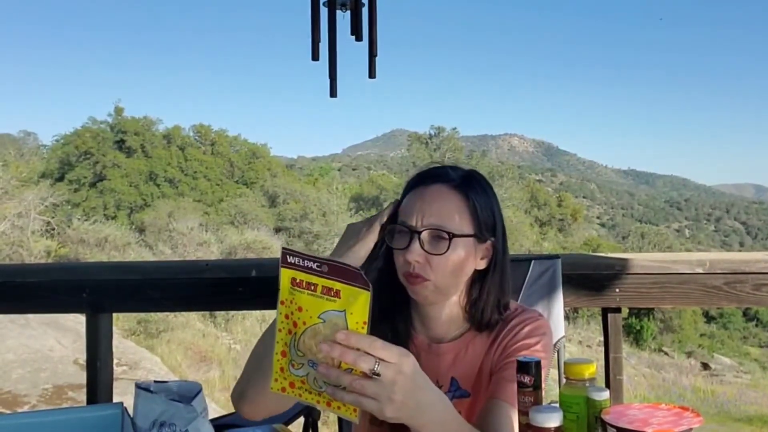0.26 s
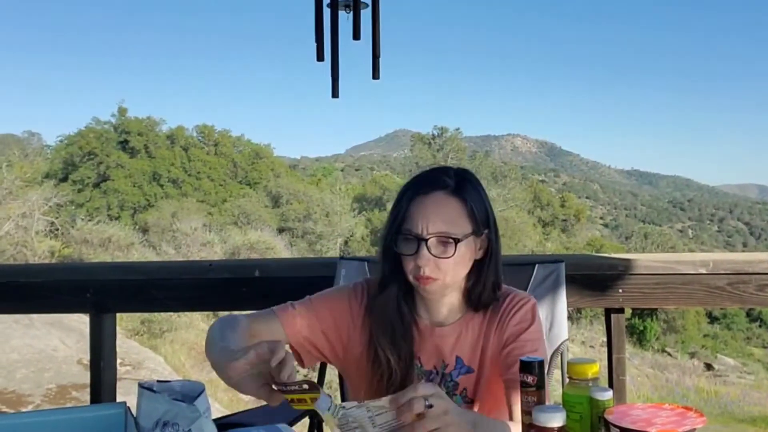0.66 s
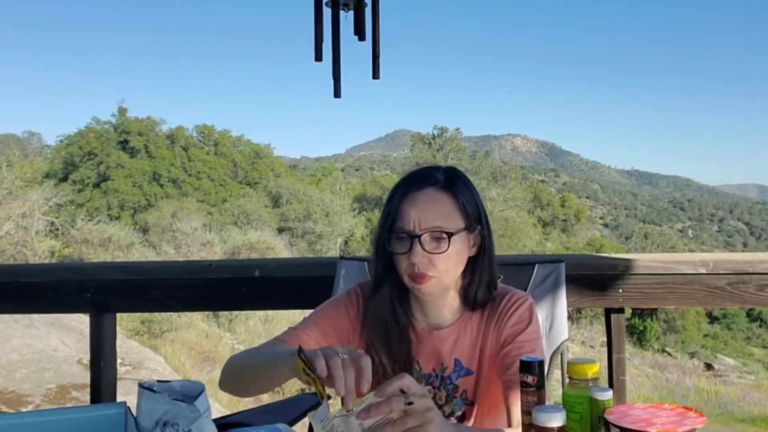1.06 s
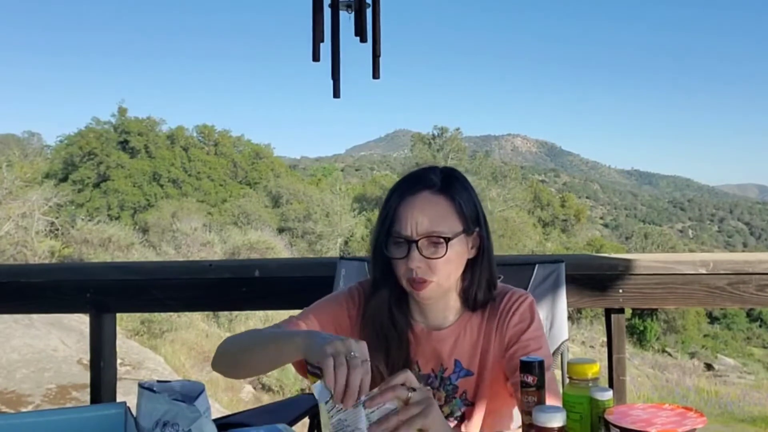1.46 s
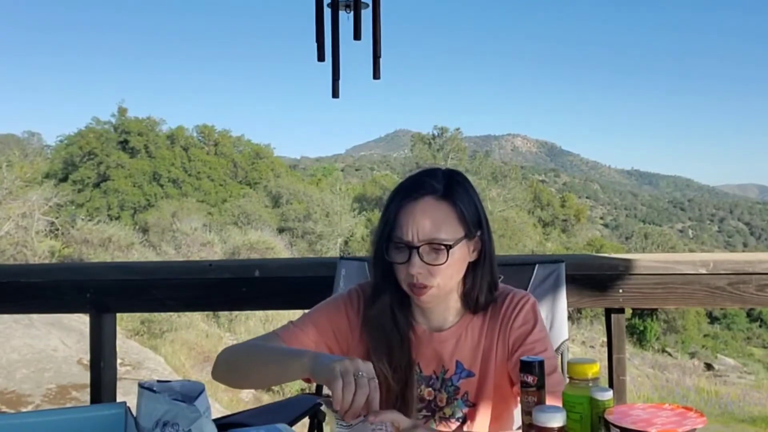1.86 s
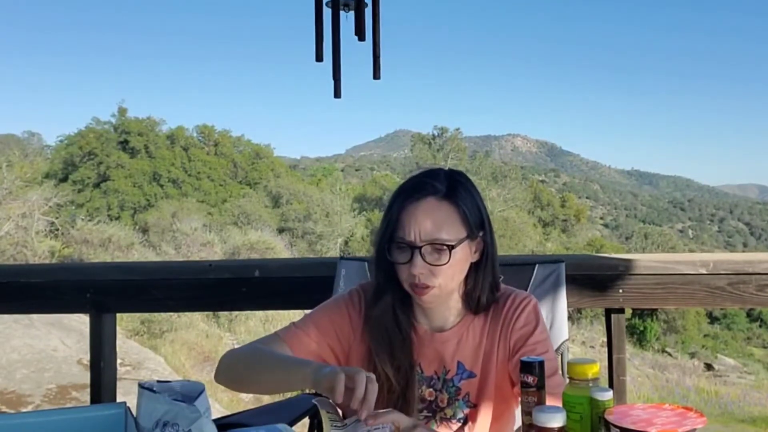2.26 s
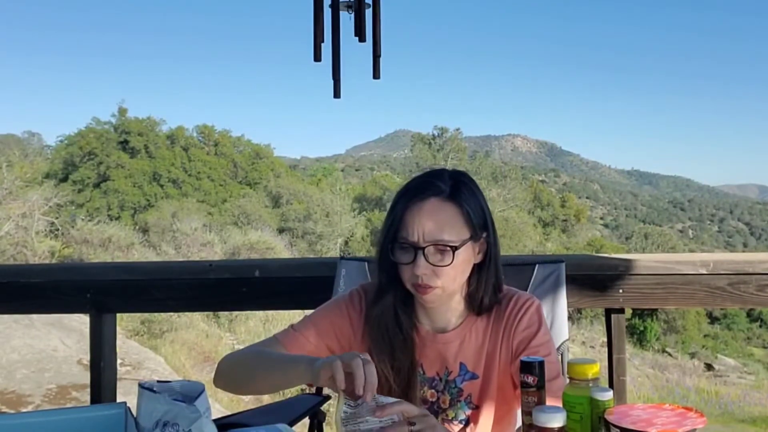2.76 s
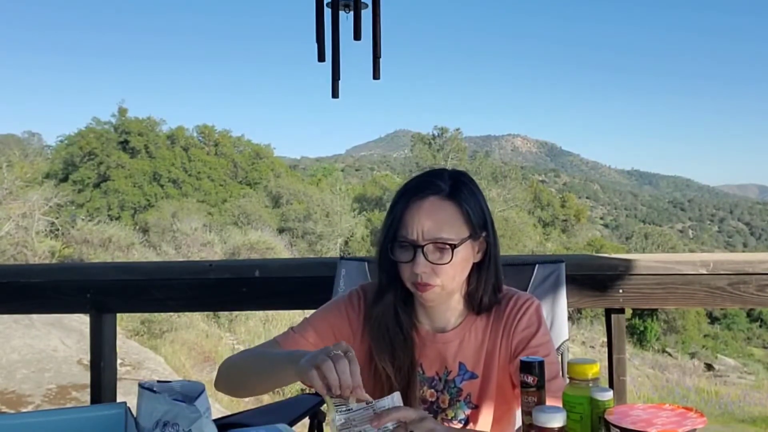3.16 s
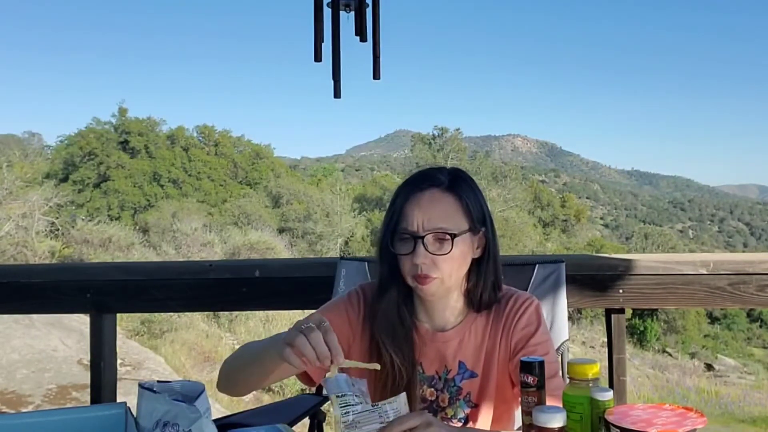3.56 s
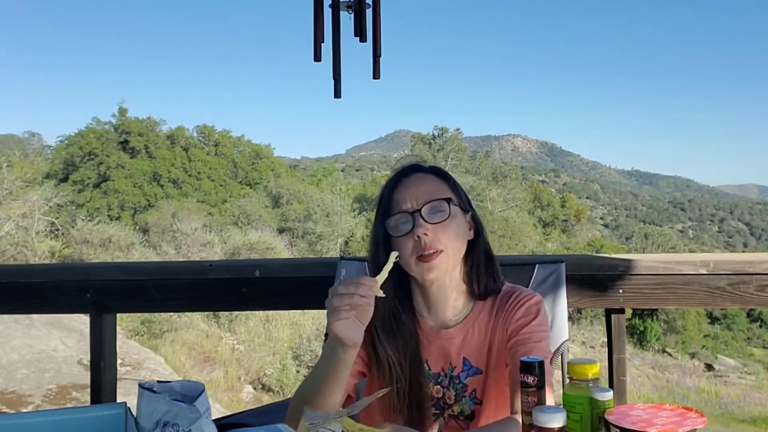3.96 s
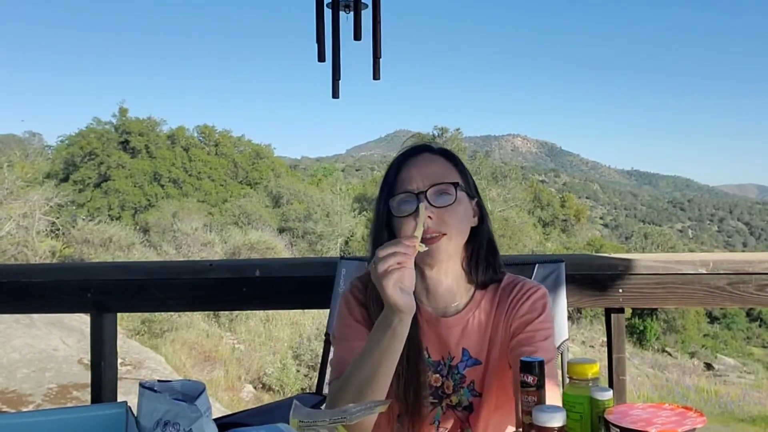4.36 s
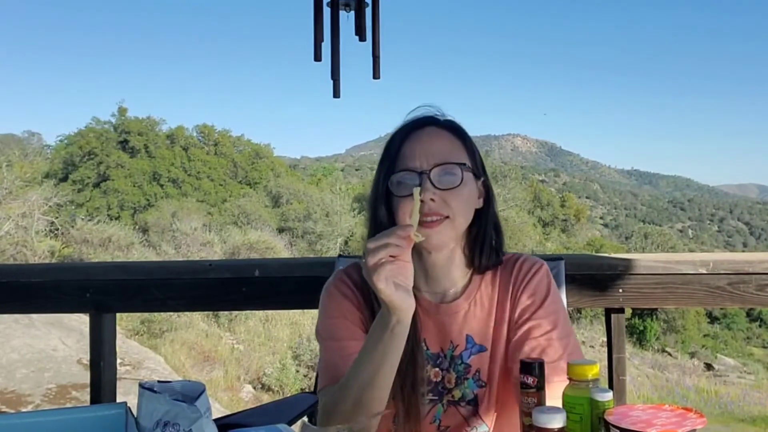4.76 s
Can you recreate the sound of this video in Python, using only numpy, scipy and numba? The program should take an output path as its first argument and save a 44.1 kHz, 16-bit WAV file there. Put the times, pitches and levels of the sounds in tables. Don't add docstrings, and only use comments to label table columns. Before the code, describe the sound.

A quiet porch in open air, heard in stereo from about a metre. The first 0.6 seconds hold only faint valley air, slight hiss and soft low wind puffs. Around 0.65 a hand bumps a hollow table, and at 0.8 a foil snack bag gives a loud crackle with another knock. Light ticks continue until 1.3, then a very sharp snap at 1.64 opens the densest rustling, lasting to about 2.2 with creases, small squeaks and muted knocks. A faint far bird whistles rising notes near 1.45, 2.25 and 2.45. Snaps cluster again at 2.8 to 3.2, then scattered ticks, with cracks near 3.85. At 4.4 to 4.6 dull table knocks return with soft crumpling, and a last crisp crackle comes at 4.8. Bassy wind buffeting swells throughout, differing left and right, strongest between 0.7 and 4.1. Reflections are short and soft.

```python
import sys
import numpy as np
from scipy import signal
from scipy.fft import rfft, irfft
from scipy.io import wavfile
from scipy.ndimage import uniform_filter1d, map_coordinates
from numba import njit

SR = 44100
rng = np.random.default_rng(int(sys.argv[2]) if len(sys.argv) > 2 else 0)


def ratio_of_db(decibels):
    return 10 ** (np.asarray(decibels, float) / 20)


def unload_audio(sound):
    columns = np.transpose(np.atleast_2d(sound))
    steps = np.round(np.clip(columns, -1, 1) * 32767)
    wavfile.write(sys.argv[1], SR, steps.astype(np.int16))


N = 221025
TIME = np.arange(N) / SR


def unit(x):
    return x / np.sqrt(np.mean(x ** 2))


def read(curve, t):
    s, *columns = np.transpose(curve)
    return [np.interp(t, s, column) for column in columns]


def colour_db(points, hz):
    point_hz, point_db = np.transpose(points)
    return np.interp(np.log(hz), np.log(point_hz), point_db, left=-90)


def sides(pan_db):
    return ratio_of_db(np.array([pan_db, -pan_db]) / 2)


def walk(rate_hz):
    hold = int(SR / rate_hz)
    steps = np.repeat(rng.standard_normal(N // hold + 1), hold)
    slewed = uniform_filter1d(uniform_filter1d(steps, hold), hold)
    return unit(slewed[:N])


@njit
def svf(x, hz, q):
    y, band, low, damping = np.empty(len(x)), 0., 0., 1 / q
    for i in range(len(x)):
        g = np.tan(np.pi * hz[i] / SR)
        v = (band + g * (x[i] - low)) / (1 + g * (g + damping))
        band, low, y[i] = 2 * v - band, low + 2 * g * v, damping * v
    return y


def gusts_db(puffs):
    calm_db = -60.5
    power = ratio_of_db(2 * calm_db)
    for s, half_s, db in puffs:
        power = power + ratio_of_db(2 * db) * np.exp(-((TIME - s) / half_s) ** 2)
    return 10 * np.log10(power)


def steady(x, hold_s=0.033, share=0.49):
    return unit(x / uniform_filter1d(x ** 2, int(hold_s * SR)) ** (share / 2))


# (centre [s], half length [s], peak level [dB])
PUFFS_LEFT = [(0.193, 0.017, -45), (0.203, 0.1, -55.5), (0.413, 0.0093, -46), (0.732, 0.029, -34),
              (0.781, 0.28, -41), (0.948, 0.024, -35), (1.059, 0.013, -41), (1.481, 0.047, -43.5),
              (1.846, 0.015, -50), (2.015, 0.047, -40.5), (2.126, 0.025, -31), (2.217, 0.017, -34),
              (2.403, 0.17, -42), (2.784, 0.083, -56), (2.989, 0.019, -38), (3.113, 0.043, -38),
              (3.254, 0.017, -35), (3.261, 0.062, -39.5), (3.47, 0.024, -45.5), (3.62, 0.012, -42),
              (3.92, 0.032, -38), (3.993, 0.014, -31.5), (4.04, 0.04, -41), (4.352, 0.14, -54.5),
              (4.468, 0.014, -36.5), (4.553, 0.037, -41), (4.827, 0.02, -44), (4.992, 0.041, -48)]
# (centre [s], half length [s], peak level [dB])
PUFFS_RIGHT = [(0.138, 0.094, -57.5), (0.28, 0.02, -47), (0.419, 0.015, -49), (0.587, 0.021, -43),
               (0.72, 0.029, -43), (0.913, 0.15, -43), (0.935, 0.061, -41.5), (1.06, 0.015, -31.5),
               (1.367, 0.019, -46), (1.52, 0.035, -37), (1.628, 0.03, -44.5), (1.99, 0.033, -44.5),
               (2.177, 0.056, -38), (2.412, 0.08, -46.5), (2.608, 0.029, -40), (2.903, 0.33, -52.5),
               (3.103, 0.023, -34.5), (3.319, 0.01, -32.5), (3.328, 0.14, -48), (3.685, 0.077, -56),
               (3.8, 0.027, -46.5), (3.936, 0.052, -46.5), (4.067, 0.016, -37.5), (4.107, 0.016, -36.5),
               (4.454, 0.021, -46), (4.606, 0.08, -47), (5.05, 0.13, -44)]


def wind(eddy_hz=70, swing_hz=44, flap_hz=150, top_hz=105, q=1.51, puff_db=1.5, shared=0.34, flap_db=-24):
    common, still = rng.standard_normal(N), np.ones(N)
    steep = signal.butter(4, top_hz, fs=SR, output="sos")
    ports = []
    for puffs in (PUFFS_LEFT, PUFFS_RIGHT):
        db = gusts_db(puffs)
        eddy_db = 1.5 + 0.41 * (db + 46.0)
        air = rng.standard_normal(N) + shared * common
        shed_hz = eddy_hz * (1 + 0.1 * walk(9.7))
        buffeting = svf(svf(air, shed_hz, q), shed_hz, q)
        eddy = steady(signal.sosfilt(steep, buffeting))
        swing = steady(svf(svf(air, swing_hz * still, 1.87), swing_hz * still, 1.87))
        flap = unit(svf(air, flap_hz * still, 3.7))
        mix = ratio_of_db(-eddy_db / 2) * swing + ratio_of_db(eddy_db / 2) * (eddy + ratio_of_db(flap_db) * flap)
        ports.append(ratio_of_db(db - 5 + puff_db * walk(12)) * mix)
    return np.array(ports)


# (frequency [Hz], level per Hz [dB])
VALLEY = [(76, -33), (130, -5.5), (156, -8), (194, -3.5), (291, -4.5), (363, -9.5), (453, -4.5), (554, -9),
          (664, -10), (1060, -17), (1320, -19.5), (1580, -24.5), (7500, -38.5), (9870, -41), (16000, -35.5)]


def valley(level_db=-69, apart_hz=1500):
    hz = np.fft.rfftfreq(N, 1 / SR) + 1
    mid, side = rfft(rng.standard_normal((2, N))) * ratio_of_db(colour_db(VALLEY, hz))
    side = side * np.clip(hz / apart_hz, .3, 1)
    air = unit(irfft(np.array([mid + side, mid - side]), N))
    return air * ratio_of_db(level_db + 0.09 * walk(1.08))


@njit
def ring(s, hz, t60, left, right, turn, rise):
    out = np.zeros((2, N))
    for k in range(len(s)):
        p = np.exp((2j * np.pi * hz[k] - np.log(1000) / t60[k]) / SR)
        fast = np.exp(-1 / (rise * t60[k] * SR))
        z, r, start, soft = 1 + 0j, np.exp(1j * turn[k]), int(s[k] * SR), 1.
        for i in range(start, min(N, start + int(t60[k] * SR))):
            out[0, i] += left[k] * (1 - soft) * z.imag
            out[1, i] += right[k] * (1 - soft) * (z * r).imag
            z *= p
            soft *= fast
    return out


def lean(hz, tilt_db, knee_hz=5000, below=0.76, above=0.34):
    body = below * np.maximum(np.log2(hz / 2500), -.8)
    return tilt_db * (body + above * np.maximum(np.log2(hz / knee_hz), 0))


# (frequency [Hz], level per Hz [dB])
FILM = [(440, -5.5), (700, -10.5), (1050, -15), (1500, -7.5), (2300, -6.5), (3300, -8), (5300, -12),
        (7500, -16), (11000, -27), (16000, -36.5)]


def film(shape, tilt_db, low_hz=450, span_octaves=5.115):
    order = rng.permuted(np.broadcast_to(np.arange(shape[-1]), shape), axis=-1)
    rank = order + rng.random(shape)
    hz = low_hz * 2 ** (span_octaves * rank / shape[-1])
    return hz, colour_db(FILM, hz) + 6 * np.log2(hz / 2500) + lean(hz, tilt_db)


IN_PLAY = rng.standard_normal((400, 80))


def crackle(s, hz, db, t60, scatter_db, rise=0.0076, patchy_db=0, turn=1.0, skew=0.73, shade_db=1.3):
    size, place, phase = rng.random((3,) + hz.shape)
    in_play = map_coordinates(IN_PLAY, [s / 0.075, np.log2(hz / 400) / 0.1895], order=1)
    pan_db = read(RUSTLE, s)[2] + 5 * (place - .5) + shade_db * np.log2(hz / 2500)
    level_db = db + patchy_db * in_play - scatter_db * np.log(size + 0.0024)
    left, right = ratio_of_db(level_db) * sides(pan_db)
    lag = turn * (2 * phase - 1) + skew * np.minimum(hz / 4000, 2.2)
    t60 = t60 + 0 * hz
    return ring(s.ravel(), hz.ravel(), t60.ravel(), left.ravel(), right.ravel(), lag.ravel(), rise)


# (time [s], rustle level [dB], brightness [dB per octave], left minus right [dB])
RUSTLE = [(0.6, -99, 5, -6), (0.7, -107, -23, -1), (0.82, -46, 2, 2), (1.13, -69, 1, -4),
          (1.31, -54, -3.5, 1), (1.46, -75, 2, 0), (1.61, -68, -2, 1), (1.71, -50, -5, 1),
          (1.77, -44.5, 2.5, 1), (1.87, -51, -2, 1.5), (1.93, -40.5, -0.5, 1), (2.0, -54.5, 1, 0.5),
          (2.07, -45, -0.5, 0.5), (2.12, -61.5, -0.5, -1), (2.55, -63, 1, 1), (3.0, -82, 9, 0),
          (3.12, -61, -1, 0.5), (3.5, -66, -0.5, 1), (4.37, -71, 1, 0), (4.59, -57.5, -1, -2.5),
          (4.82, -62.5, -2, 0.5), (5.01, -60, -5, -1)]


def rustle(count=20000, clump_db=2.0, sheen_db=6):
    s = rng.uniform(RUSTLE[0][0], N / SR, count)
    db, tilt_db, _ = read(RUSTLE, s)
    hz, radiated_db = film(s.shape, tilt_db)
    clumps_db = clump_db * np.interp(s, TIME, walk(70))
    db = db + clumps_db + sheen_db * np.clip((hz - 8000) / 2500, 0, 1)
    return crackle(s, hz, db + radiated_db + 2.0, 22 / hz, scatter_db=-0.5, patchy_db=-0.5, rise=0.14)


def prickle(count=900, size=14, prickle_db=-2, scatter_db=2.0):
    s, strength = rng.random((2, count, 1))
    s = RUSTLE[0][0] + s * (N / SR - RUSTLE[0][0])
    db, tilt_db, _ = read(RUSTLE, s)
    hz, radiated_db = film((count, size), tilt_db, low_hz=920, span_octaves=4.09)
    db = db + prickle_db - scatter_db * np.log(strength + 0.015)
    return crackle(s + 0 * hz, hz, db + radiated_db, 12 / hz, scatter_db=-1.0, patchy_db=0.0, rise=0.095)


# (time [s], peak level [dB], large patch [Hz], treble minus body [dB])
CRUMPLES = [(0.6337, -44.5, 2520, -14), (0.6416, -42.5, 2310, -17), (0.9174, -66.5, 2130, -4),
            (1.557, -47.5, 1430, -23), (1.603, -58, 2330, -24), (1.6123, -36.5, 2120, -40),
            (1.735, -50.5, 1370, -13), (1.8132, -49, 2280, -12), (1.8211, -39.5, 1840, -39),
            (1.8889, -36.5, 1920, -28), (1.897, -39.5, 2330, -8), (1.962, -38, 2180, -38),
            (2.016, -43, 2140, -23), (2.07, -47, 2330, -16), (2.807, -57.5, 905, -49),
            (2.846, -56, 2300, -23), (2.914, -49, 2190, -36), (2.924, -44, 2190, -34),
            (3.1165, -62.5, 950, -8), (3.1308, -49, 2250, -42), (3.3647, -58.5, 980, -23.5),
            (3.4127, -61, 990, -10), (3.4842, -66, 1230, -6), (3.5986, -64, 1080, -24.5),
            (3.899, -58, 2130, -34), (4.4207, -41, 1240, -21), (4.433, -39, 1260, -29.5),
            (4.579, -50, 1150, -66), (4.5974, -44.5, 1370, -41), (4.7239, -34, 1860, -29.5),
            (4.9133, -38, 1120, -30.5)]
# (time [s], peak level [dB], small patch [Hz], treble minus body [dB])
TICKS = [(0.687, -54, 4100, -35), (0.9369, -45, 7200, -4), (0.964, -53.5, 3000, -9),
         (1.0528, -49, 2800, -43), (1.084, -57, 2800, -9), (1.1845, -51.5, 4060, -12),
         (1.1914, -54, 4600, -12), (1.264, -43.5, 2540, -5.5), (1.285, -40, 4870, -25),
         (1.3091, -53, 4320, -24), (1.3472, -40, 4800, -14), (1.459, -60, 3130, -28),
         (1.472, -53.5, 4200, -45), (1.57, -44, 2500, -6), (1.605, -49, 4030, -15), (1.618, -48, 4470, -12),
         (1.6735, -61, 4970, -2), (1.698, -45, 2470, -29), (1.7238, -45, 2290, -40), (1.759, -46, 4260, 1),
         (1.7703, -39.5, 2200, -10), (1.814, -39.5, 3300, -31), (1.8576, -38, 2160, -33),
         (2.184, -43.5, 2880, -46), (2.587, -77, 3370, -16), (2.787, -53, 3080, -64),
         (2.882, -52.5, 5970, -6), (2.9685, -43, 4000, -13), (3.1985, -42, 3230, -42),
         (3.3067, -54, 2850, -75), (3.3834, -45.5, 4000, -16), (3.441, -50.5, 3120, -27),
         (3.5621, -54, 2770, -6), (3.901, -53, 2440, -28), (3.997, -57.5, 3050, -17)]
# (time [s], peak level [dB], large patch [Hz], small patch [Hz], treble minus body [dB])
CRACKS = [(0.8146, -27, 2800, 6840, -20.5), (0.836, -20, 1290, 1790, -30.5),
          (0.8389, -25.5, 1300, 1760, -40), (1.3394, -37.5, 1760, 3000, -8), (1.6347, -36, 2150, 2870, -20),
          (1.6439, -17.5, 2270, 3360, -12), (1.65, -32, 2200, 3300, -26), (1.6548, -51, 2184, 3290, -31),
          (1.6631, -37, 1330, 3040, -52), (1.6878, -36.5, 1340, 3230, -44),
          (1.7504, -31.5, 1480, 2850, -33), (1.909, -23.5, 2240, 3830, -34),
          (1.9663, -32.5, 1530, 3050, -42), (2.0518, -26.5, 1760, 2050, -16.5),
          (2.0598, -29, 1100, 2630, -23), (2.201, -25, 2170, 2970, -48), (2.3459, -36, 1420, 4700, -36),
          (2.3632, -30, 1910, 3370, -19.5), (2.8413, -34.5, 2000, 3010, -42),
          (2.933, -23.5, 2500, 3250, -17.5), (2.9501, -27.5, 1370, 2920, -32),
          (2.9634, -26.5, 2230, 3840, -30), (3.1782, -35.5, 1930, 3330, -27.5),
          (3.8376, -32, 2480, 4330, -25), (3.9154, -31, 1116, 2375, -15.5),
          (4.7944, -25, 2090, 2680, -18.5), (4.8065, -34.5, 1880, 2860, -76)]


def creases():
    rows = []
    for s, db, large_hz, small_hz, treble_db in CRACKS:
        after_db = -15.5 - 0.36 * (db + 35.0)
        rows.append((s, db, large_hz, small_hz, treble_db, after_db, -1, 0.5))
    for s, db, large_hz, treble_db in CRUMPLES:
        rows.append((s - 0.001, db, large_hz, 2790, treble_db, 3.5, 1.5, -1.5))
    for s, db, small_hz, treble_db in TICKS:
        rows.append((s, db, 1450, small_hz, treble_db, -14.5, -4.5, 1.5))
    return rows


def crack(s, db, large_hz, tilt_db, crack_s, burst_s=.0003):
    hz, radiated_db = film((len(s), 64), tilt_db)
    at = s + burst_s * rng.random(hz.shape)
    radiated_db = radiated_db + 16 * np.minimum(np.log2(hz / large_hz) + 0.45, 0)
    finest = np.clip(np.log2(hz / 7800) / 0.44, 0, 1)
    radiated_db = radiated_db + 9 * np.minimum(tilt_db - 3.5, 0) * finest
    level_db = db + radiated_db - 1.22 * np.log2(hz / 2500) - 5.5
    return crackle(at, hz, level_db, np.minimum(crack_s, 22 / hz), scatter_db=-0.5, rise=0.14)


def shower(s, db, large_hz, tilt_db, after_s, swell_s=0.0034):
    hz, radiated_db = film((len(s), 360), tilt_db)
    late = 4 * rng.random(hz.shape)
    swell = 1 - np.exp(-late * after_s / swell_s)
    fade_db = 20 * np.log10(swell + 0.0013) - 6.32 * late
    size_db = 5 * np.minimum(np.log2(hz / large_hz) + 0.39, 0)
    level_db = db + radiated_db - 1.5 + fade_db + size_db
    at = s + after_s * late - .0015
    return crackle(at, hz, level_db, 20 / hz, scatter_db=0.5, patchy_db=4.0, rise=0.028)


def freed_patch(s, db, patch_hz, tilt_db, crack_s, after_s, spread=0.042, patch_db=-8, hum_db=-29):
    hz = patch_hz * (1 + spread * np.array([0, -1, 1]))
    level_db = db + lean(hz, tilt_db) + patch_db + np.array([5, -4, -4])
    struck = crackle(s + 0 * hz, hz, level_db, 1.43 * crack_s, scatter_db=-2.0, rise=0.11)
    hz = patch_hz * (1 + 0.21 * spread * rng.standard_normal((len(s), 16)))
    late = 3 * rng.random(hz.shape)
    level_db = db + lean(hz, tilt_db) + hum_db - 7 * late
    return struck + crackle(s + .005 + after_s * late, hz, level_db, 40 / hz, scatter_db=2.0)


def snaps(after_s=.018, crack_s=0.0064):
    columns = np.transpose(creases())[:, :, None]
    s, db, large_hz, small_hz, treble_db, after_db, large_db, small_db = columns
    tilt_db = (treble_db + 27.0) / 2.69
    out = crack(s, db, large_hz, tilt_db, crack_s)
    out += shower(s, db + after_db, large_hz, tilt_db, after_s)
    out += freed_patch(s, db + large_db, large_hz, tilt_db, crack_s, after_s)
    return out + freed_patch(s, db + small_db, small_hz, tilt_db, crack_s, after_s)


# (time [s], peak level [dB], upper modes [dB], rattle length [s])
KNOCKS = [(0.643, -43.5, -5, 0.017), (0.838, -35.5, -4, 0.016), (1.191, -60.5, -2, 0.021),
          (1.284, -51.5, -5, 0.02), (1.555, -54.5, 3.5, 0.021), (1.619, -42.5, -26, 0.035),
          (1.696, -47, -0.5, 0.03), (1.799, -60, -9, 0.015), (1.899, -50.5, -11, 0.019),
          (2.043, -47.5, -1, 0.023), (2.955, -43, -1, 0.02), (3.173, -44, -8.5, 0.02),
          (4.418, -33.5, -1, 0.03), (4.451, -37.5, -2, 0.02), (4.498, -58.5, 14.5, 0.021),
          (4.526, -55.5, 9.5, 0.013), (4.592, -40.5, 1.5, 0.018), (4.616, -52.5, 5, 0.028),
          (4.722, -36, 0.5, 0.029), (4.914, -42, -1, 0.021)]
# (frequency [Hz], level [dB], 60 dB decay [s])
TABLE = [(182, -14.5, 0.033), (235.6, -7.5, 0.059), (300, -10, 0.032), (350.4, 2, 0.058),
         (376, -15.5, 0.03), (511, -7.5, 0.032), (652, -9.5, 0.036), (761, -6, 0.021), (997, -8.5, 0.06),
         (1235, -5, 0.029), (1453, -11, 0.012), (1940, -3, 0.0074)]


def folding_table(count=24, rise=0.03):
    s, db, upper_db, rattle_s = np.transpose(KNOCKS)[:, :, None, None]
    hz, mode_db, t60 = np.transpose(TABLE)
    upper = hz > 450
    rebounds = 3 * rng.random((len(s), count, 1))
    late = np.concatenate([np.zeros((len(s), 1, 1)), rebounds], axis=1)
    detune = 1 + 0.058 * rng.standard_normal((len(s), count + 1, len(hz)))
    lighter_db = 6.0 * late + (late > 0) * np.where(upper, 5, 11)
    gain = ratio_of_db(db + mode_db + upper_db * upper - lighter_db)
    at = s + np.abs(rattle_s) * late
    at, hz, t60 = (np.broadcast_to(v, gain.shape).ravel() for v in (at, hz * detune, t60))
    turn = 0.86 * (hz > 450) * rng.standard_normal(len(at))
    return ring(at, hz, t60, gain.ravel(), gain.ravel(), turn, rise)


# (start [s], end [s], pitch [Hz], level [dB])
SQUEAKS = [(0.686, 0.695, 2330, -58.5), (0.698, 0.744, 2470, -67.5), (0.686, 0.716, 4370, -71),
           (1.777, 1.782, 1410, -54), (1.853, 1.862, 2170, -64), (1.664, 1.668, 1370, -53),
           (4.062, 4.081, 3700, -82), (0.754, 0.789, 2080, -76), (0.93, 0.98, 7000, -67),
           (1.05, 1.122, 7100, -87), (1.181, 1.202, 4860, -70.5), (1.333, 1.356, 10600, -75),
           (2.122, 2.152, 2180, -65.5), (2.204, 2.214, 2960, -56.5), (2.376, 2.401, 3500, -78.5),
           (4.797, 4.852, 2700, -85)]


def squeaks(count=30):
    start, end, hz, db = np.transpose(SQUEAKS)[:, :, None]
    slip, detune = rng.random((2, len(hz), count))
    when = (np.arange(count) + slip) / count
    hz = hz * (1 + 0.034 * (detune - .5) - 0.036 * when)
    return crackle(start + (end - start) * when, hz, db - 6 * when, 0.02, scatter_db=2.0)


def porch(x, t60=0.13, wall_s=0.0085, wall_fade_s=0.0049, wall_db=12, wet_db=-9):
    t = TIME[:int(.2 * SR)]
    since = np.maximum(t - wall_s, 0)
    wall = 1 + ratio_of_db(wall_db) * np.exp(-since / wall_fade_s)
    shape = (t > wall_s) * ratio_of_db(-60 * since / t60) * wall
    shared, own = rng.standard_normal(len(t)), rng.standard_normal((2, len(t)))
    tail = (shared + 1.47 * own) * shape
    tail = tail / np.sqrt(np.sum(tail ** 2, axis=1, keepdims=True))
    return x + ratio_of_db(wet_db) * signal.fftconvolve(x, tail, axes=1)[:, :N]


# (start [s], level [dB])
NOTES = [
    (1.44, -88),
    (2.25, -77),
    (2.455, -77.5),
]
# (time after start [s], pitch [Hz], level [dB])
NOTE = [(0, 3350, 2), (.015, 3600, 0), (.035, 4200, 1), (.05, 4350, -3), (.09, 4300, -4)]


def bird(echo_s=.012, echo_db=-14):
    out = 0
    for start, level_db in NOTES:
        since = TIME - start
        hz, db = read(NOTE, since)
        edge = np.clip(np.minimum(since, NOTE[-1][0] - since) / 0.0023, 0, 1)
        flutter_db = 1.5 * walk(170) + 3.5 * np.sin(2 * np.pi * 135 * since)
        whistle = np.sin(2 * np.pi * np.cumsum(hz) / SR)
        out = out + np.sqrt(2) * edge * ratio_of_db(level_db + db + flutter_db) * whistle
    echo = ratio_of_db(echo_db) * np.roll(out, int(echo_s * SR))
    return (out + echo) * sides(1.9)[:, None]


def scene():
    knocks = folding_table()
    bag = rustle() + prickle() + snaps() + squeaks()
    return wind() + valley() + knocks / 2 + porch(bag + knocks / 2) + bird()


def low_pass(x):
    return signal.sosfilt(signal.butter(12, 15950, fs=SR, output="sos"), x)


# (frequency [Hz], level [dB])
MICROPHONE = [(100, 0.5), (7000, 2), (8300, -1.5), (9500, -5.5), (11000, -0.5), (13000, 3.5), (16000, 3.5)]


def record(dry):
    hz = np.fft.rfftfreq(N, 1 / SR) + 100
    heard = irfft(rfft(dry) * ratio_of_db(colour_db(MICROPHONE, hz)), N)
    return low_pass(heard)


dry = scene()
out = record(dry)
unload_audio(out)
```